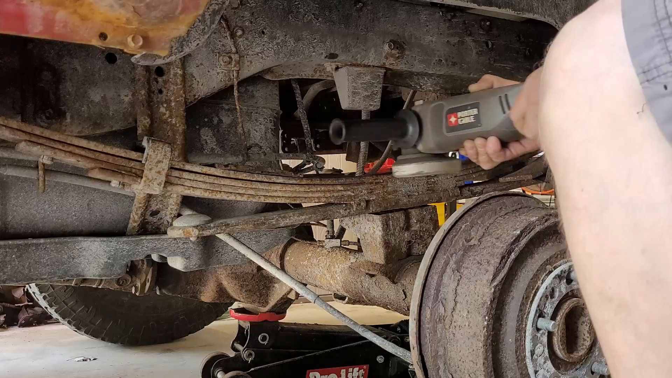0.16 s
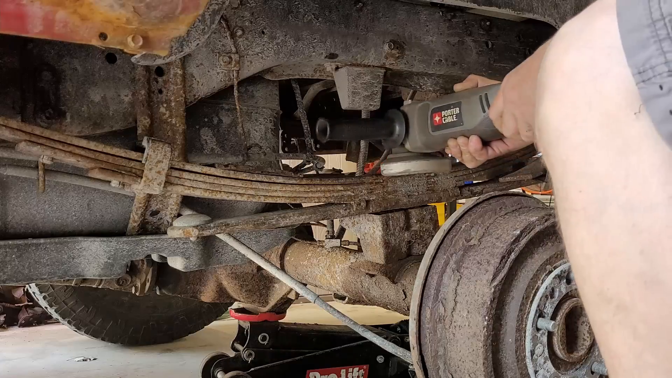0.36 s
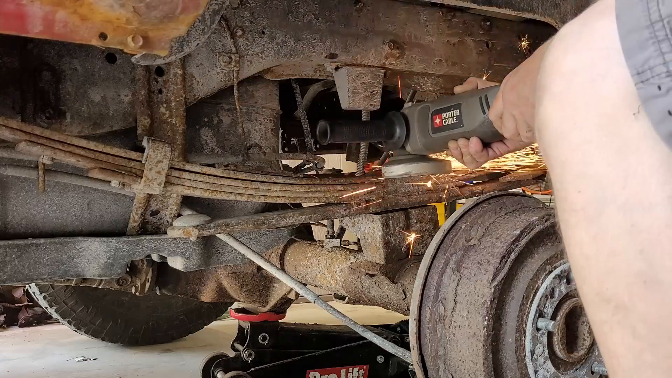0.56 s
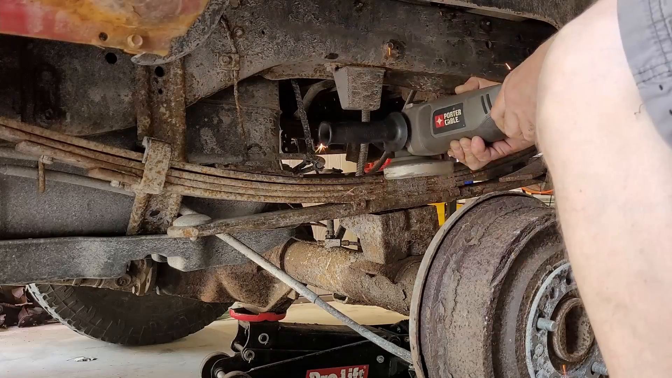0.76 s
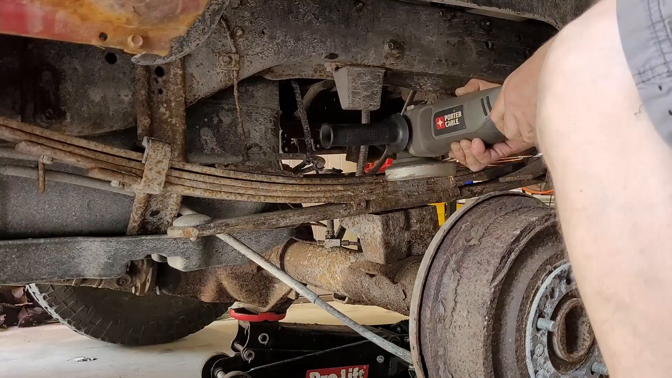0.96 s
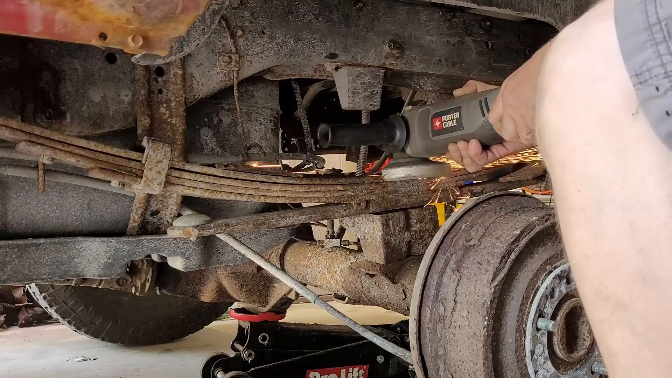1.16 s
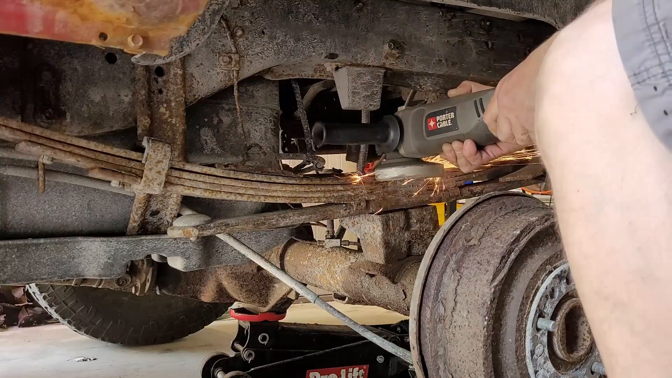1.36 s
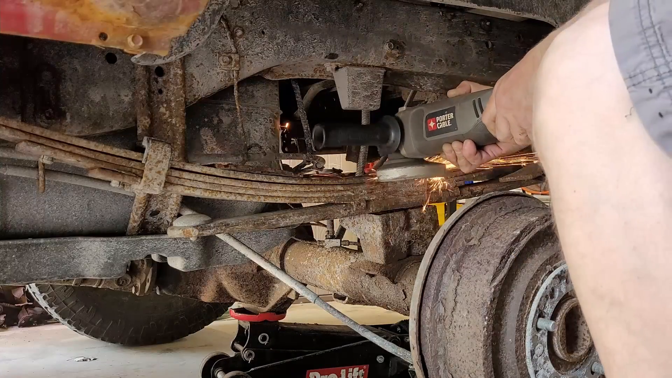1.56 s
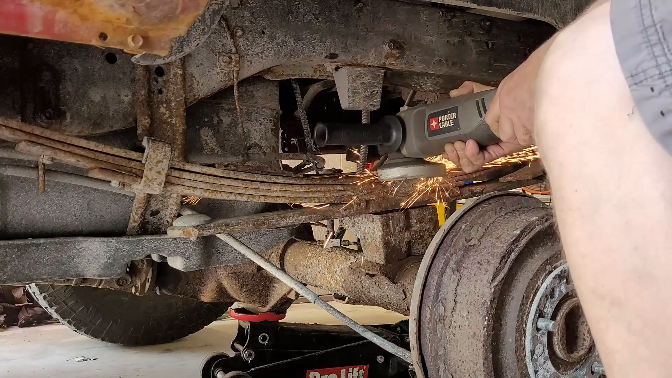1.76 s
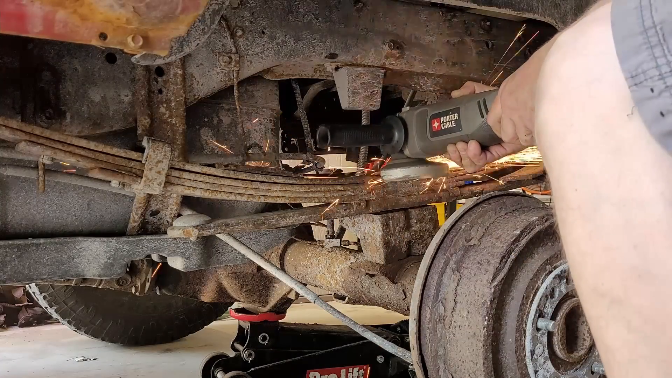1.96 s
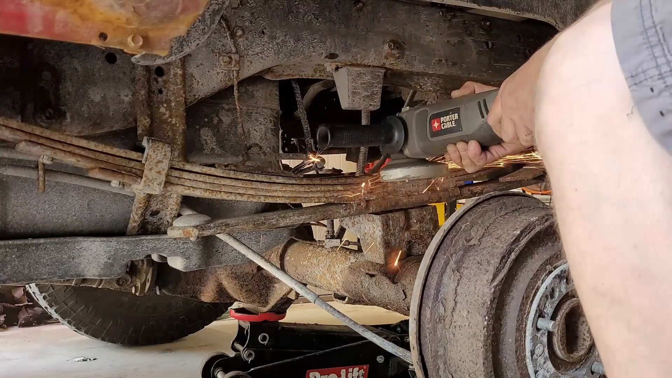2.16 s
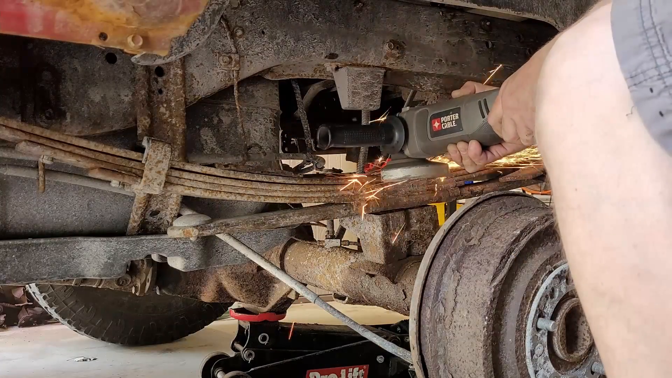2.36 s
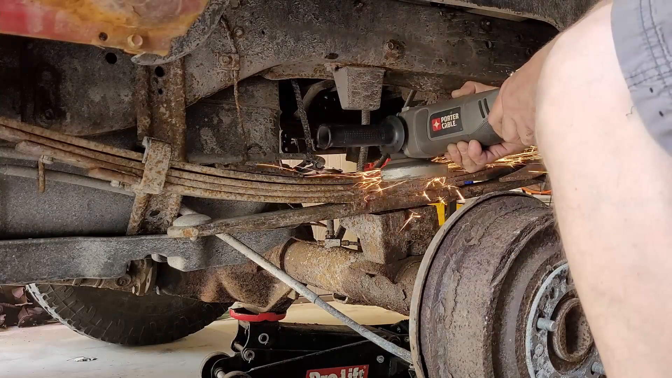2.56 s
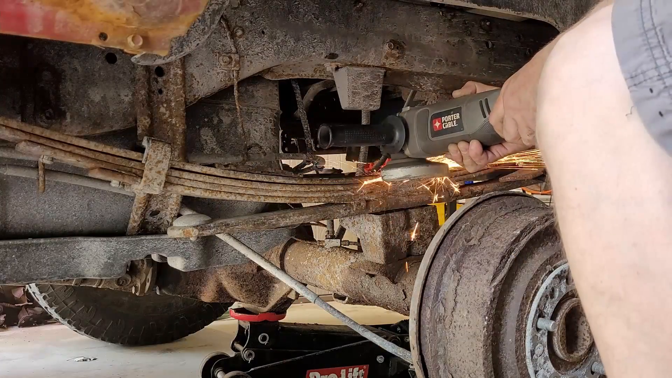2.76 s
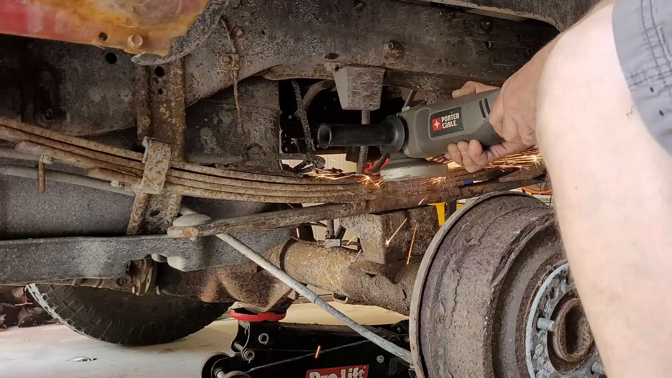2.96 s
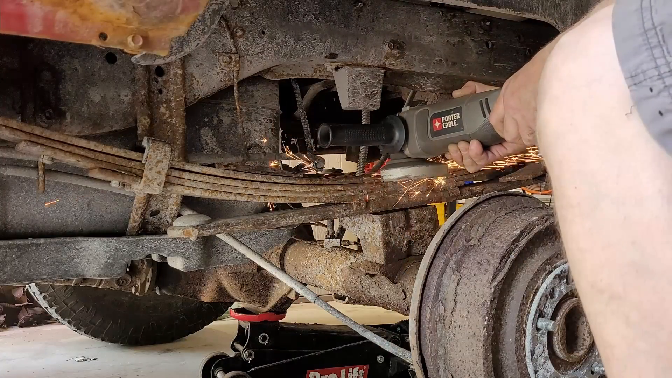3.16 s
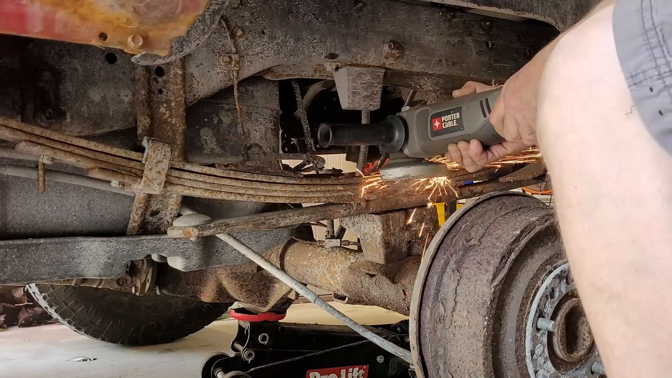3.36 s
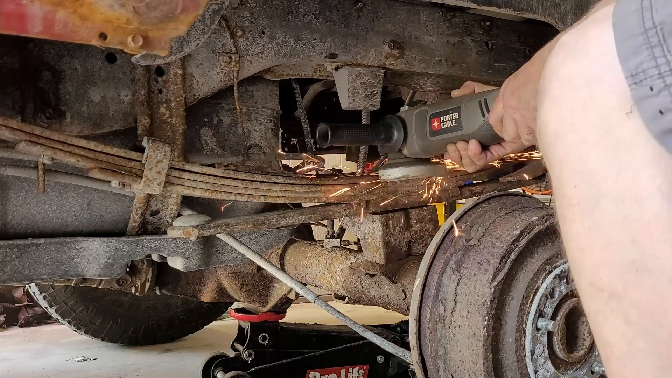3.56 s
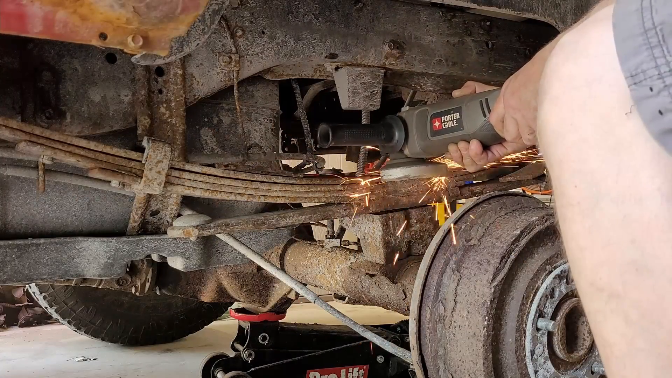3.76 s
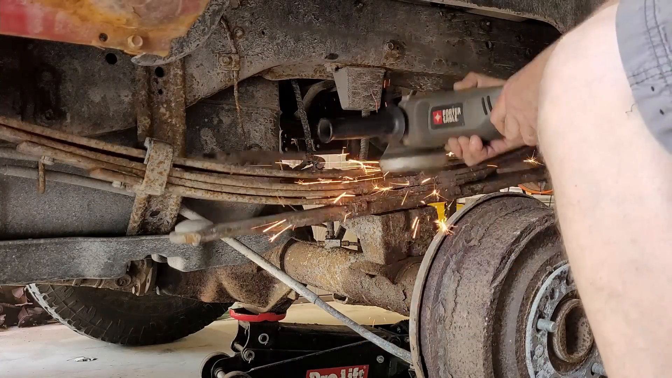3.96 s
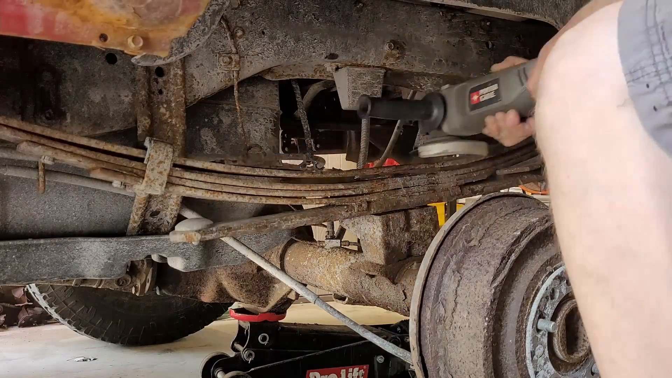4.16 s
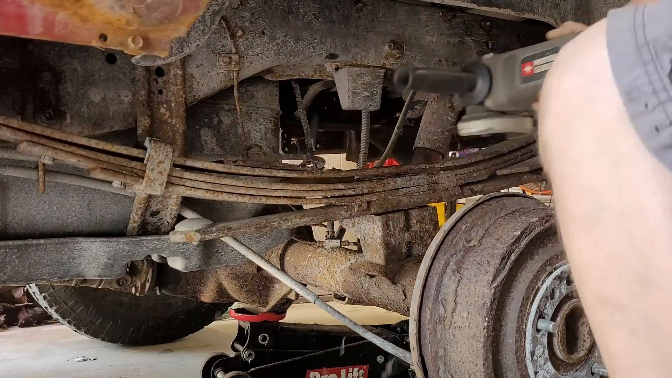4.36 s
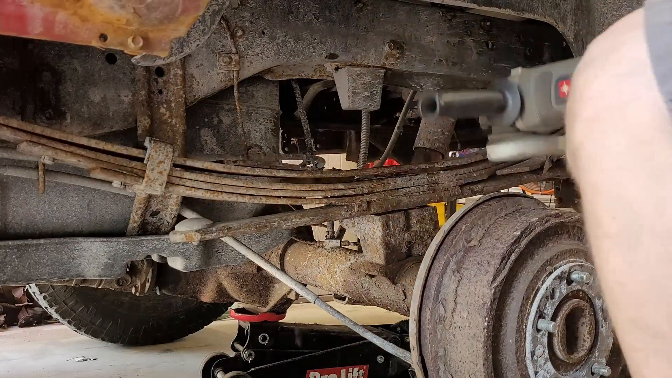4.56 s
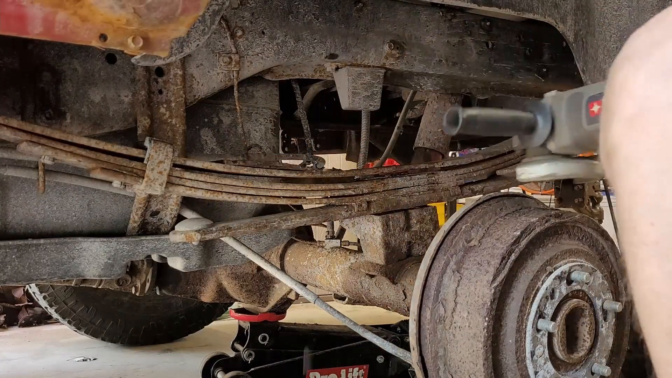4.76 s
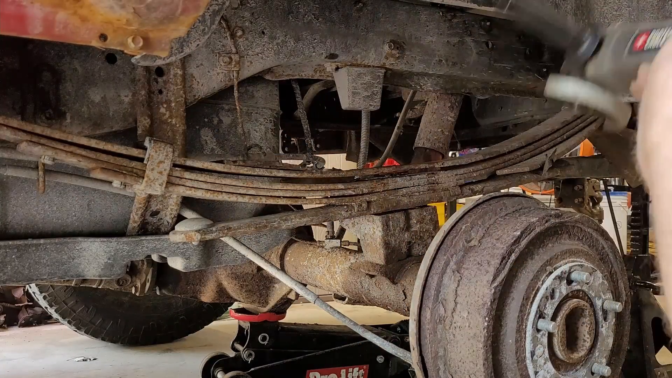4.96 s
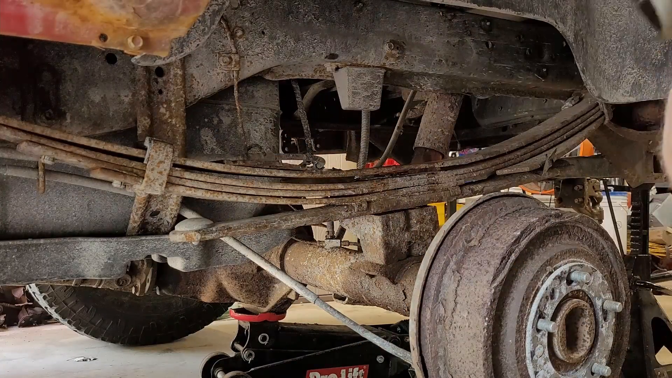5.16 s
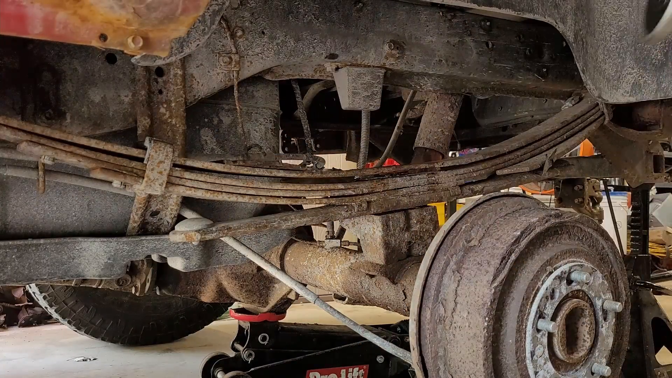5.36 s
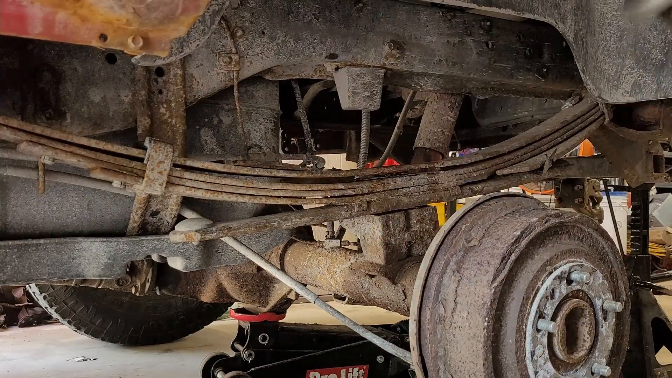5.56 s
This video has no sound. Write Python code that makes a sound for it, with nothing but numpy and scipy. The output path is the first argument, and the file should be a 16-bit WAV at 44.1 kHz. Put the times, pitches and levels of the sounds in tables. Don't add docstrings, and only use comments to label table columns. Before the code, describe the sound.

Close stereo recording in a garage, under a vehicle. An angle grinder spins free with airy hiss and a few clicks, then its disc bites rusted steel: harsh gritty roar, brief hitch, squeals, and a motor whine sinking under load. After about three and a half seconds the clamp snaps with a loud crack and low thump, and the tool speeds up again, rattling metallically.

```python
import sys
import numpy as np
from scipy import signal
from scipy.fft import rfft, irfft, next_fast_len
from scipy.io import wavfile
from scipy.ndimage import map_coordinates

SR = 44100
rng = np.random.default_rng(int(sys.argv[2]) if len(sys.argv) > 2 else 0)


def waveform_to_disk(signal):
    frames = np.transpose(np.atleast_2d(signal))
    scaled = np.clip(frames, -1, 1) * 32767
    samples = np.round(scaled).astype(np.int16)
    wavfile.write(sys.argv[1], SR, samples)


def volts_from_decibels(level):
    exponent = np.asarray(level, float) / 20
    return 10 ** exponent


N = 247886
PAD = next_fast_len(N)
HZ = np.maximum(np.arange(PAD // 2 + 1) * SR / PAD, 1)
T = np.arange(N) / SR
TOUCH_S, SNAP_S = 0.54, 3.987
OPPOSED = np.array([[0.5], [-0.5]])

# t/s, turns f/Hz
SPEED = [(0, 140.), (.55, 146.2), (1.05, 148.), (1.2, 145.7), (1.7, 119.4), (1.9, 114.7), (2.15, 109.6),
         (2.8, 104.1), (3., 100.7), (3.33, 98.4), (3.5, 93.7), (3.72, 93.4), (3.92, 95.2), (3.985, 92.5),
         (4.3, 114.), (4.45, 130.), (4.65, 135.2), (5.62, 107.)]
# f/Hz, width/Hz, lift/dB
STEEL_MODES = [(725, 6.8, 14), (1410, 520, -10), (1535, 30, 17.5), (1684, 62, 9), (1800, 94, 2),
               (1980, 21, 8), (2102, 72, 10), (2230, 29, -14), (2414, 21, -17), (2650, 60, 7.5),
               (3095, 57, 9), (3470, 61, 8.5), (3850, 27, -1), (3950, 30, 3), (4150, 40, 8),
               (4720, 60, 7.5), (4900, 67, 10), (5630, 820, -17.5)]


def in_time(rows):
    s, *columns = np.transpose(rows)
    return [np.interp(T, s, c) for c in columns]


def at_hz(points, hz):
    f, db = np.transpose(points)
    return np.interp(np.log(hz), np.log(f), db)


def rms_one(x):
    return x / np.sqrt(np.mean(x ** 2) + 1e-20)


def drift(rate_hz):
    hop = 40
    r = np.exp(-2 * np.pi * rate_hz * hop / SR)
    noise = rng.standard_normal(N // hop + 1002)
    slow = signal.lfilter([1], [1, -2 * r, r * r], noise)[1000:]
    return np.interp(np.arange(N) / hop, np.arange(len(slow)), rms_one(slow))


def lift_db(modes, hz):
    return sum(db / (1 + (2 * (hz - f) / w) ** 2) for f, w, db in modes)


def held(rows, edge_s):
    return sum(volts_from_decibels(db) * np.clip(np.minimum(T - s, s + length - T) / edge_s, 0, 1) for s, length, db in rows)


def faded(rows, fade_s):
    return sum(volts_from_decibels(db) * (T >= s) * np.exp(-np.maximum(T - s, 0) / fade_s) for s, db in rows)


def bursts(s, db, fade_s):
    clicks = np.zeros(N)
    np.add.at(clicks, (np.asarray(s) * SR).astype(int), volts_from_decibels(db))
    return signal.lfilter([1], [1, -np.exp(-1 / (fade_s * SR))], clicks + 1e-18)


def ring(clicks, hz, t60):
    r, w = volts_from_decibels(-60 / (t60 * SR)), 2 * np.pi * hz / SR
    return signal.lfilter([0, np.sin(w)], [1, -2 * r * np.cos(w), r * r], clicks + 1e-18)


def chirp(clicks, hz, t60):
    return ring(ring(clicks, hz, t60 / 3), hz, t60)


def disc_edge():
    turns = np.cumsum(in_time(SPEED)[0]) / SR
    shapes = rng.standard_normal((72, 360))
    edge = rms_one(map_coordinates(shapes, [turns / 12, turns % 1 * 359], order=1))
    return np.array([np.roll(edge, -1), edge])


def hiss(spectrum, modes, patchy_db, shared_db, repeat_db=-50.0, shield_db=(0, 0), top_hz=11000):
    # f/Hz, likeness 0-1
    coherence = [(60, 0.7), (180, 0.83), (550, 0.68), (1650, 0.094), (4970, 0.013), (15000, 0.025)]
    alike = np.clip(at_hz(coherence, HZ), 0, 1)
    mid, side = rfft(rng.standard_normal((2, PAD)))
    pair = np.sqrt(1 + alike) * mid + np.sqrt(1 - alike) * side * [[1], [-1]]
    pair = pair + volts_from_decibels(repeat_db) * rfft(disc_edge(), PAD)
    pair = pair * volts_from_decibels(at_hz(spectrum, HZ) + lift_db(modes, HZ))
    octave, together, out = np.log2(HZ), shared_db * drift(18.4), 0
    spacing = 0.7
    lowest, highest = np.log2(spectrum[0][0]), np.log2(spectrum[-1][0])
    for centre in np.arange(lowest, highest + spacing, spacing):
        window = np.cos(np.pi / 2 * np.clip((octave - centre) / spacing, -1, 1)) ** 2
        flicker_db = together + patchy_db * drift(8.2)
        flicker_db = flicker_db + shield_db[0] * (centre < np.log2(7000))
        flicker_db = flicker_db + shield_db[1] * (centre > np.log2(top_hz))
        out = out + volts_from_decibels(flicker_db) * irfft(pair * window, PAD)[:, :N]
    return rms_one(out)


def tones(orders, turns_hz):
    angle, out = 2 * np.pi * np.cumsum(turns_hz) / SR, np.zeros((2, N))
    for k, level_db in orders:
        waver_db = 3 * np.clip(drift(3.0), -2, 1.2)[::64]
        gain = volts_from_decibels(level_db + lift_db(STEEL_MODES, k * turns_hz[::64]) + waver_db)
        phase = k * angle + rng.uniform(0, 2 * np.pi) + 0.5 * drift(4.0)
        apart = min(k * turns_hz[N // 2] / 2000, 1) * rng.uniform(-0.4, 1.8)
        out += np.repeat(gain, 64)[:N] * np.sin(phase + apart * OPPOSED)
    return out / np.sqrt(np.sum(volts_from_decibels(np.array(orders)[:, 1]) ** 2))


def motor_air(speed, free):
    # f/Hz, density/dB
    air_colour = [(59, -56), (100, -22.5), (194, -22), (262, -9.5), (418, -15.5), (456, -7), (507, -9),
                  (903, -3), (2080, -6.5), (2260, 2.5), (4880, -14.5), (6870, -12.5), (12800, -13.5),
                  (16500, -28)]
    # f/Hz, width/Hz, lift/dB
    panel_modes = [(600, 19, 3), (891, 15, 5), (987, 10, 6), (1111, 12, 4), (1464, 35, 4.5)]
    return volts_from_decibels(-24.5) * free * speed ** 1.51 * hiss(air_colour, panel_modes, patchy_db=1.27, shared_db=1.03)


def idle_hum(motor_hz, free, cutting):
    return volts_from_decibels(-44.5) * free ** 0.18 * (1 - cutting) * tones([(0.5, -3.0), (1, -2.0)], motor_hz)


def steel_roar(speed, free, bite_db, rings_db, graze, cutting, load):
    # f/Hz, density/dB
    roar_colour = [(710, -52), (1200, -43), (1430, -14), (1630, -2), (2040, -4), (2300, -1.5), (3090, -6.5),
                   (4280, 0), (5520, -5), (6500, -14.5), (8450, -54), (14300, -120)]
    driven = volts_from_decibels(-25 + 0.55 * (bite_db + 25) + 7 + rings_db)
    gain = np.hypot(driven + 1.7 * graze, volts_from_decibels(-32.5) * free * speed)
    half_modes = [(hz, width, db / 2) for hz, width, db in STEEL_MODES]
    duller_db = -4 * (cutting - load)
    return volts_from_decibels(-2.5) * gain * hiss(roar_colour, half_modes, patchy_db=0.42, shared_db=0.33,
                                   repeat_db=-4.5, shield_db=(0, duller_db), top_hz=3300)


def grit_hiss(shield_db, cutting):
    # f/Hz, density/dB
    grit_colour = [(3060, -40), (5200, -4.5), (5840, 0.5), (8030, -1.5), (8890, -2), (9890, 0),
                   (14400, 3.5), (15100, 3.5), (16500, -2)]
    # f/Hz, width/Hz, lift/dB
    shallow_modes = [(6280, 260, 2), (6800, 250, 3), (7500, 200, 5), (8050, 200, 4), (9400, 220, 3.5),
                     (11000, 300, 3), (11900, 650, 5.5), (12500, 300, 4.5), (13400, 250, 2),
                     (13850, 300, 4), (15250, 300, 6)]
    # f/Hz, width/Hz, lift/dB
    halfway_modes = [(6300, 500, 3), (6910, 120, 5), (7330, 140, 5), (8200, 350, 7), (9950, 400, 5.5),
                     (11000, 250, 4), (11600, 400, 3.5), (12600, 300, 5), (13450, 300, 4),
                     (15450, 500, 5.5)]
    # f/Hz, width/Hz, lift/dB
    deep_modes = [(5400, 150, -6), (6760, 350, 5.5), (7750, 200, 6), (8230, 350, 8), (9200, 300, 6),
                  (10000, 300, 6), (11000, 250, 1), (11700, 400, 3), (12600, 250, 4), (14500, 200, 3),
                  (15350, 400, 7)]
    # f/Hz, width/Hz, lift/dB
    late_modes = [(5770, 200, 6), (6090, 80, 12), (6570, 180, 10.5), (7580, 240, 8.5), (8150, 300, 3),
                  (8900, 120, 0), (10250, 180, 3), (10900, 300, -2), (12700, 220, 3), (13500, 120, -4),
                  (15600, 400, 6)]
    # f/Hz, width/Hz, lift/dB
    free_modes = [(6960, 1700, -9), (11000, 1400, 6.5)]
    # f/Hz, width/Hz, lift/dB
    slot_gaps = [(5870, 840, -6.5), (7040, 200, -4), (8900, 340, -1.5), (14100, 400, -3)]
    stage_starts = [
        2.05,
        2.75,
        3.42,
    ]
    past = [1] + [np.clip((T - s) / 0.12, 0, 1) for s in stage_starts] + [0]
    stages = shallow_modes, halfway_modes, deep_modes, late_modes
    shares = [(cutting * (a - b), modes + slot_gaps) for a, b, modes in zip(past, past[1:], stages)]
    shares.append((1 - cutting, free_modes))
    return sum(np.sqrt(share) * hiss(grit_colour, modes, patchy_db=0.78, shared_db=0.48,
                                     repeat_db=-3.5, shield_db=shield_db) for share, modes in shares)


def grit(speed, free, bite_db, depth, graze, cutting):
    shield_db = (12 - 30 * depth, 2 - 3 * (1 - cutting))
    gain = np.hypot(volts_from_decibels(bite_db) + graze, volts_from_decibels(-38) * free * speed ** 3.7)
    return volts_from_decibels(4.0) * gain * grit_hiss(shield_db, cutting)


def ground():
    # f/Hz, density/dB
    rumble_colour = [(15, -60), (25, -30), (43, -44), (64, 8), (107, 1), (172, -42), (202, 1), (250, -5),
                     (320, -55), (550, -120)]
    # t/s, length/s, level/dB
    swells = [
        (.55, 1.3, -52.5),
        (2.6, 0.64, -63),
        (5.25, 0.43, -47.5),
    ]
    # t/s, peak level/dB
    jolts = [
        (0.548, -27),
        (0.94, -22),
        (1.599, -44),
        (2.159, -52.5),
        (3.72, -32),
        (4.359, -31),
    ]
    clicks = np.zeros(N)
    for s, db in jolts:
        clicks[round(s * SR)] = volts_from_decibels(db)
    shake = faded([(SNAP_S + 0.038, -30)], 1.5 / np.log(1000))
    level = volts_from_decibels(-54) + held(swells, 0.088) + shake
    return level * hiss(rumble_colour, [], patchy_db=-0.5, shared_db=1.0) + ring(clicks, 52.0, 0.08)


def taps():
    beats = np.cumsum(in_time(SPEED)[0]) / SR / 4
    s = np.flatnonzero(np.diff(beats // 1)) / SR
    chance = rng.standard_normal((len(s), 3))
    rows = np.c_[s + 0.004 * chance[:, 0], -30 + 3.5 * chance[:, 1], -34 + 3.5 * chance[:, 2]]
    unloaded = (s < TOUCH_S) | (s > SNAP_S + 0.15)
    return rows[unloaded & (s < N / SR - 0.02)]


def rattle():
    # t/s, gear case level/dB, guard level/dB
    knocks = [(0.1121, -24, -34), (0.2683, -14.5, -17), (0.3696, -18, -24.5), (0.408, -17, -24),
              (0.4299, -14.5, -27), (0.858, -15, -33), (4.1777, -30, -45), (4.4455, -25, -40),
              (4.461, -25, -40), (4.6167, -25, -31), (4.678, -42, -34), (4.7588, -26, -13),
              (4.7825, -20, -20), (4.8082, -18, -16), (4.834, -20, -26), (4.8588, -18, -16),
              (4.8955, -20, -42), (5.0661, -48.5, -32), (5.1225, -24, -42), (5.1272, -18, -43),
              (5.1715, -20, -45), (5.1762, -17.5, -44), (5.2035, -26, -44), (5.2072, -17.5, -44),
              (5.2138, -23, -44), (5.218, -24, -47.5), (5.2308, -13.5, -42), (5.2632, -15.5, -40),
              (5.2868, -20, -14), (5.3265, -16.5, -21), (5.354, -11, -13), (5.3834, -13, -27),
              (5.4233, -9.5, -25), (5.4518, -12, -36), (5.494, -12.5, -14), (5.5044, -12.5, -10),
              (5.546, -14, -18), (5.5889, -13.5, -28), (5.61, -24, -34)]
    # f/Hz, level/dB, T60/s
    case_modes = [(2020, -7, .010), (2330, -4, .009), (2650, -7, .010), (2990, -2, .014), (3600, -1, .012),
                  (4030, 1, .014), (4420, 1, .014), (4800, -5, .012)]
    # f/Hz, level/dB, T60/s
    guard_modes = [(9380, 4, .011), (9650, -3, .009)]
    # t/s, f/Hz, peak level/dB
    rim_ticks = [(.27, 10100, -26), (4.452, 7950, -28), (4.468, 9340, -32), (4.714, 9350, -28),
                 (4.98, 9500, -39), (5.27, 11400, -26), (5.423, 11100, -17), (5.425, 10300, -19),
                 (5.455, 10600, -26), (5.546, 10300, -22), (5.588, 11000, -27), (5.598, 7640, -29)]
    # t/s, peak level/dB
    cracks = [(0.1125, -16), (0.2675, -4.5), (.3696, -9), (0.4313, -3), (.858, -14), (4.1782, -7),
              (4.444, -5), (4.7598, -14), (4.8065, -10.5), (4.895, -21), (5.1718, -9), (5.2072, -10),
              (5.2144, -17), (5.218, -11), (5.232, -19), (5.287, -11), (5.355, -14), (5.383, -17),
              (5.4245, 0), (5.456, -7), (5.5062, -1), (5.509, -4), (5.5456, -4.5), (5.5892, -14),
              (5.611, -12)]
    s, case_db, guard_db = np.vstack([knocks, taps()]).T
    soften = np.exp(-1 / (0.0007 * SR))
    chatter = bursts(s - 0.002, case_db - 22.0, 0.0065)
    chatter = signal.lfilter([1 - soften], [1, -soften], chatter)
    damped = volts_from_decibels(-9.5 * (T < 5.31))
    out = np.zeros(N)
    for hz, db, t60 in case_modes:
        hand = damped if hz < 3300 else 1
        out += volts_from_decibels(db) * hand * ring(chatter * rng.choice([-1.0, 1.0], N), hz, t60)
    guard = np.diff(bursts(s + 0.002, guard_db - 17.5, 0.0002), prepend=0)
    out += sum(volts_from_decibels(db) * chirp(guard, hz, t60) for hz, db, t60 in guard_modes)
    rub = rng.choice([-1.0, 1.0], N)
    out += sum(chirp(bursts([tick_s], db - 17.0, 0.003) * rub, hz, 0.007) for tick_s, hz, db in rim_ticks)
    crack_s, crack_db = np.transpose(cracks)
    band = signal.butter(2, [2240, 5450], "band", fs=SR)
    crack = signal.lfilter(*band, rng.choice([-1.0, 1.0], N))
    return out + bursts(crack_s, crack_db, 0.0014) * crack


def leaf():
    # t/s, length/s, level/dB
    sings = [
        (.39, 0.061, -34),
        (1.535, .12, -32),
        (1.73, 0.12, -39),
        (2.54, 0.13, -43),
        (2.86, 0.14, -45),
        (3.39, .17, -35),
        (3.59, 0.06, -38),
        (3.63, .39, -45),
        (3.77, .25, -45),
    ]
    # t/s, length/s, level/dB, f/Hz
    squeals = [
        (0.92, 0.25, -34, 998),
        (.74, .1, -36, 985),
        (5.9, 0.2, -33, 1300),
        (1.085, 0.13, -23.5, 3600),
        (1.358, .1, -28, 1800),
        (1.722, .18, -28, 1630),
    ]
    out = volts_from_decibels(5.0 + 0.5 * drift(13.0)) * held(sings, 0.038) * np.sin(2 * np.pi * 716 * T + drift(1.1) / 2)
    for s, length, db, hz in squeals:
        level = held([(s, length, db)], 0.016) * volts_from_decibels(1.3 * drift(17.0))
        out = out + level * np.sin(2 * np.pi * hz * T + drift(9.9) / 2)
    return out


def disc_tones(turns_hz):
    disc_orders = [(3, -22), (4, -15), (5, -19), (6, -18), (7, -16), (8, -16), (10, -15), (12, -13),
                   (14, -10), (15, -12), (16, -6.), (17, -9.), (18, -8.), (19, -9.), (20, -9.), (21, -5.),
                   (22, -3.), (23, -9), (24, -10), (26, -10), (28, -10), (32, -11), (35, -11), (37, -9),
                   (40, -6), (42, -6), (43, -8), (44, -7), (45, -9), (48, -11)]
    # t/s, length/s, level/dB
    seated = [
        (.8, 0.91, -56),
        (1.95, 0.9, -25),
        (2.8, 0.98, -29),
        (3.7, 0.39, -28.5),
    ]
    return held(seated, 0.061) * tones(disc_orders, turns_hz)


def gear_tones(motor_hz, load):
    gear_orders = [(1, -11), (2, -20), (7, -4), (13, -13)]
    return load ** 2.7 * volts_from_decibels(-38.5) * tones(gear_orders, motor_hz)


def mesh(motor_hz, load):
    mesh_orders = [(7, -8), (8, 5.5), (9, 4.5), (10, 5.5), (11, -2.5), (12, -2), (14, -2.5)]
    # f/Hz, width/Hz, lift/dB
    housing_modes = [(2880, 24, 9), (3140, 180, 9), (3430, 130, 9), (3480, 60, -7), (3840, 35, 12),
                     (4060, 190, 5), (4247, 170, 9), (4630, 230, 9.5), (5000, 73, 4), (4950, 47, 6)]
    # t/s, length/s, added level/dB
    blooms = [
        [(2.1, .65, 4), (3.2, .25, 0)],
        [(1.8, 1, -1.5), (2.6, 0.36, 0.5), (3.35, .15, -2)],
        [(1.45, .2, -10), (2.4, 0.57, 4), (3.15, 0.18, -3)],
        [(2.4, 0.29, 2.5), (2.85, 0.35, -5), (3.55, .43, -4)],
        [(1.95, .2, 8), (2.4, .35, 11), (2.85, 0.74, 4.5), (3.6, 0.32, 3)],
        [(2.1, 0.85, 4.5), (2.85, .2, 0)],
        [(3.463, .5, 1)],
    ]
    # t/s, length/s, added gain level/dB
    pushes = [
        (1.61, 0.072, -5),
        (1.775, 0.067, 6.5),
        (2.8, 0.24, -13),
        (3.72, 0.36, -11.5),
    ]
    angle = 2 * np.pi * np.cumsum(motor_hz) / SR
    out = 0
    for (k, db), rows in zip(mesh_orders, blooms):
        bloom_db = sum(added * held([(s, length, 0)], 0.13) for s, length, added in rows)
        waver_db = np.clip(drift(5.0), -2.5, 1.2)
        gain = volts_from_decibels(-38 + db + bloom_db + lift_db(housing_modes, k * motor_hz) + waver_db)
        out = out + gain * np.sin(k * angle + 1.2 * OPPOSED + drift(4.0) / 2)
    return load * (1 + held(pushes, 0.031)) * out


def clear_tones(turns_hz):
    # t/s, length/s, level/dB
    lines = [
        (2.12, .72, -36),
        (3.15, .25, -38),
        (1.9, 0.25, -37),
        (2.45, 0.55, -35),
        (3.75, 0.18, -39),
        (2.06, .9, -44),
    ]
    multiples = (17, 17, 19, 20, 22, 16)
    angle = 2 * np.pi * np.cumsum(turns_hz) / SR
    return sum(held([row], 0.062) * volts_from_decibels(5 + 1.5 * drift(6.0)) * np.sin(k * angle + drift(2.5) / 2 + OPPOSED)
               for row, k in zip(lines, multiples))


def grinder():
    # t/s, level/dB
    bite = [(0.53, -39), (0.55, -25), (0.74, -25.5), (0.77, -36), (0.85, -34), (0.87, -30), (0.92, -31),
            (1.2, -24.5), (1.53, -24.5), (1.58, -29.5), (1.63, -23), (1.69, -29), (1.75, -23), (1.8, -24.5),
            (3.3, -24.5), (3.56, -25), (4.0, -22.5), (4.045, -40.5)]
    # t/s, depth 0-1, freedom of the steel to ring level/dB
    slot = [
        (.56, 0.1, -2),
        (.85, 0.03, 2),
        (1.2, 0, 4),
        (1.8, 0.22, -0.5),
        (2.4, 0.33, -3),
        (3.3, 0.5, -2.5),
        (3.58, 0.32, -4),
        (3.98, 0.9, -3),
        (4.1, 0.4, 0.5),
    ]
    # t/s, level while running free/dB, left-right level/dB
    place = [
        (0, 1, 0),
        (.4, 0.5, 1),
        (.7, 4, -0.5),
        (1.3, 3, 0.5),
        (3.95, 2.5, 0.5),
        (4.12, -2, -1),
        (4.4, 0, 0),
        (5.1, -1.5, -1.5),
        (5.401, 7, -0.5),
    ]
    # t/s, grit level/dB
    grazes = [
        (.39, -38),
        (4.45, -34),
        (4.68, -41),
        (5.22, -37),
        (5.425, -30),
    ]
    (turns_hz,), (bite_db,), (depth, rings_db), (near_db, pan_db) = map(in_time, (SPEED, bite, slot, place))
    motor_hz = 34 / 9 * turns_hz
    unloaded_hz, stalled_hz = 149, 93
    speed, free = turns_hz / unloaded_hz, volts_from_decibels(near_db)
    cutting = held([(TOUCH_S, SNAP_S - TOUCH_S, 0)], 0.02)
    load = cutting * np.clip((unloaded_hz - turns_hz) / (unloaded_hz - stalled_hz), 0, 1)
    graze = faded(grazes, 0.022)
    noise = motor_air(speed, free) + steel_roar(speed, free, bite_db, rings_db, graze, cutting, load)
    noise = noise + grit(speed, free, bite_db, depth, graze, cutting)
    whine = disc_tones(turns_hz) + gear_tones(motor_hz, load) + mesh(motor_hz, load) + clear_tones(turns_hz)
    return (noise + idle_hum(motor_hz, free, cutting) + leaf() + whine) * volts_from_decibels(pan_db * OPPOSED)


def snap():
    # t/s, peak level/dB, dullness f/Hz, T60/s, spring shake level/dB
    slaps = [(3.987, 2.5, 11000, 0.2, -24), (3.997, 1.5, 1590, 0.19, -1.5), (4.007, -7, 685, 0.056, 3),
             (4.019, 3, 2500, 0.027, -2), (4.04, -12, 900, 0.15, -2), (4.053, -9, 1200, 0.054, 0),
             (4.069, -12.5, 393, 0.6, 0), (4.099, -28, 253, 0.43, 0), (4.14, -19, 218, 0.88, 0),
             (4.181, -8, 5000, 0.065, -14), (4.189, -9, 1100, 0.19, -8), (4.446, -17, 9000, 0.071, -20)]
    # f/Hz, level/dB, T60/s
    spring_modes = [(61.2, -9, 0.65), (80.4, -17, 0.34), (105, -8, 0.16), (125, -13, 0.23), (151, -17, 0.3),
                    (218, -19.5, 0.27), (270, -19.5, 0.15), (466, -13.5, 0.057), (574, -16, .04),
                    (1370, -29, 0.077)]
    out, clicks, t = np.zeros(N), np.zeros(N), np.arange(SR // 2) / SR
    for s, peak_db, dull_hz, t60, shake_db in slaps:
        band = signal.butter(1, [70.0, dull_hz], "band", fs=SR)
        burst = signal.lfilter(*band, rng.standard_normal(len(t)))
        i = round(s * SR)
        out[i:i + len(t)] += volts_from_decibels(peak_db - 14.5 - 60 * t / t60) * rms_one(burst)
        clicks[i] = volts_from_decibels(peak_db + shake_db - 7.0)
    out += sum(volts_from_decibels(db) * ring(clicks, hz, t60) for hz, db, t60 in spring_modes)
    return signal.lfilter(*signal.butter(2, 52.0, "high", fs=SR), out)


def garage(x):
    t = np.arange(int(0.4 * SR)) / SR
    echoes = rng.standard_normal((2, len(t))) * volts_from_decibels(-60 * t / 0.14) * (t > 0.002)
    echoes = signal.lfilter(*signal.butter(2, [250.0, 6000.0], "band", fs=SR), echoes)
    return signal.fftconvolve(x[None], echoes / np.sqrt(np.sum(echoes[0] ** 2)), axes=1)[:, :N]


def scene():
    hits = rattle() + snap()
    left, right = grinder() + hits * volts_from_decibels(1.2 * OPPOSED) + volts_from_decibels(-8.5) * garage(hits) + ground()
    return np.array([np.roll(left, 2), right])


def top_cut(x):
    return signal.sosfilt(signal.butter(12, 15800, fs=SR, output="sos"), x)


def record(dry):
    # f/Hz, left-right level/dB
    tilt = [(60, 6), (240, 3.5), (950, 5), (3770, 6.5), (15000, 7)]
    ports = volts_from_decibels((at_hz(tilt, HZ) - 4.5) * OPPOSED) / (1 - 1j * 63.0 / HZ) ** 2
    rounded = 0.8 * np.tanh(irfft(rfft(dry, PAD) * ports, PAD) / 1.02)
    mix = irfft(rfft(rounded) * (HZ < 15760), PAD)[:, :N]
    return top_cut(mix)


dry = scene()
out = record(dry)
waveform_to_disk(out)
```